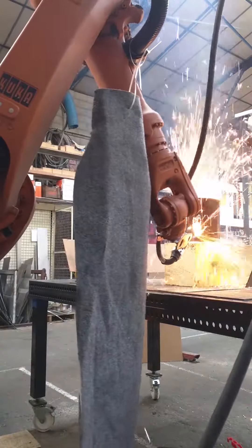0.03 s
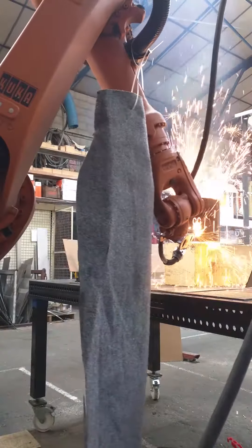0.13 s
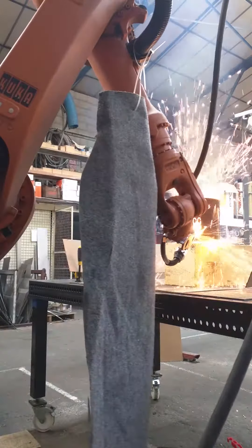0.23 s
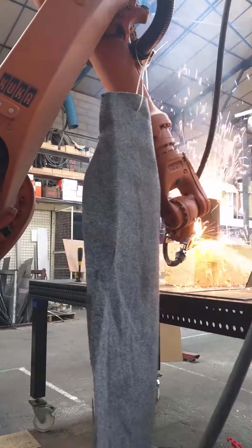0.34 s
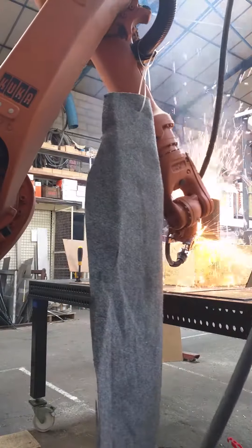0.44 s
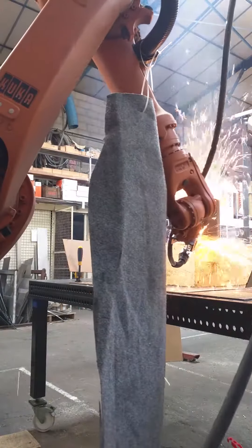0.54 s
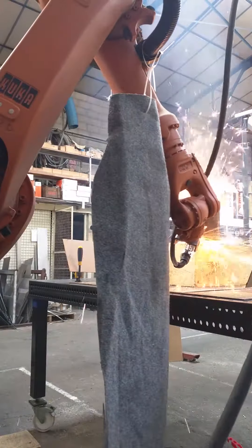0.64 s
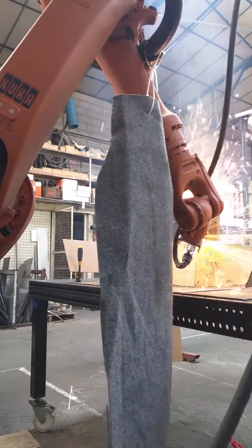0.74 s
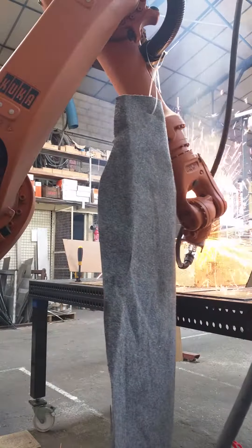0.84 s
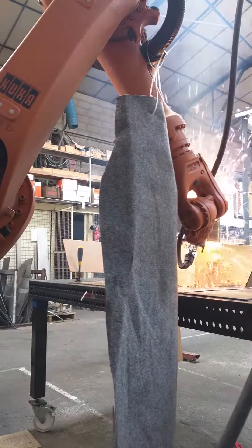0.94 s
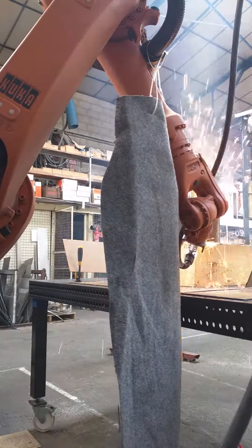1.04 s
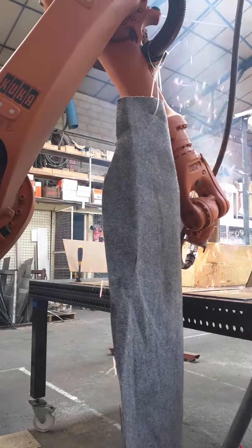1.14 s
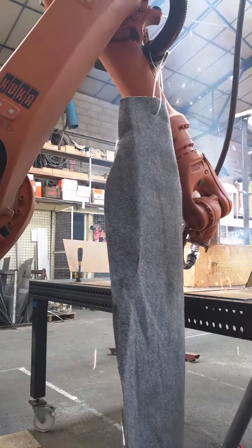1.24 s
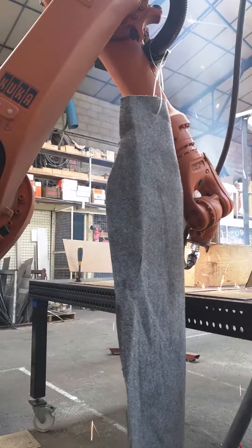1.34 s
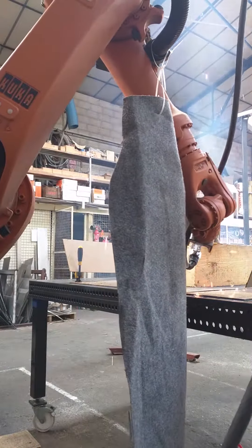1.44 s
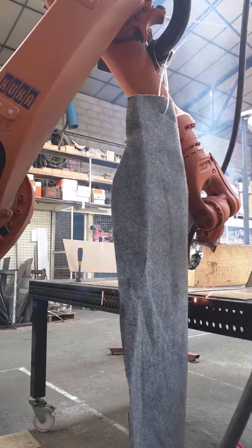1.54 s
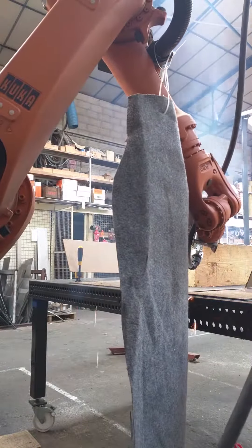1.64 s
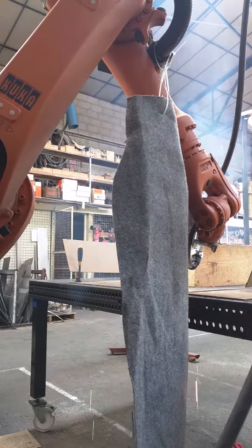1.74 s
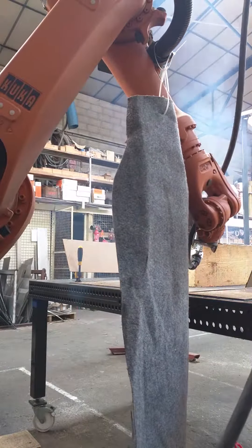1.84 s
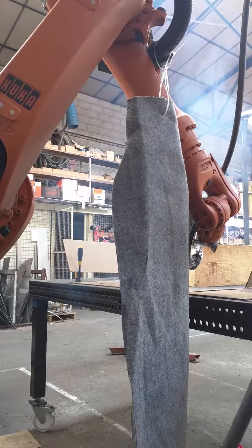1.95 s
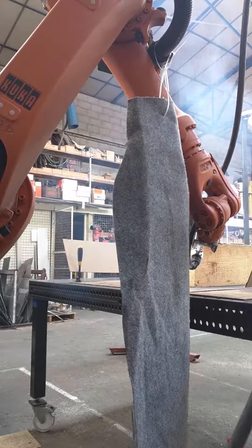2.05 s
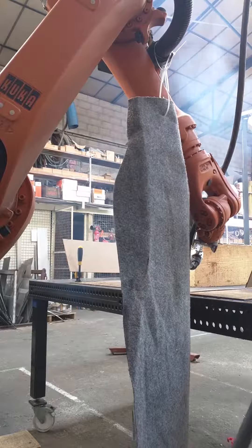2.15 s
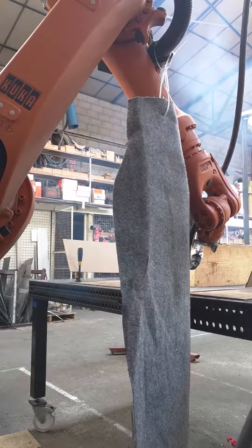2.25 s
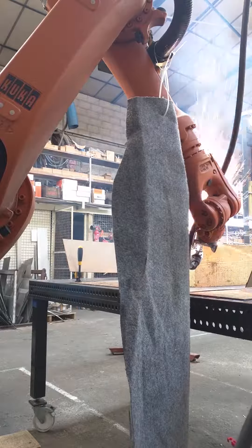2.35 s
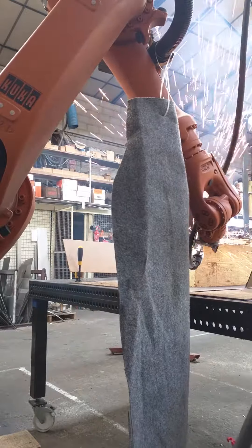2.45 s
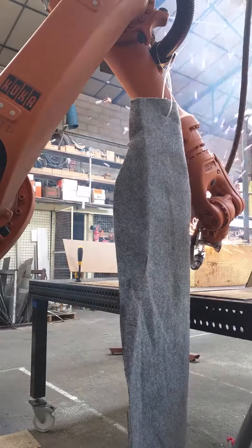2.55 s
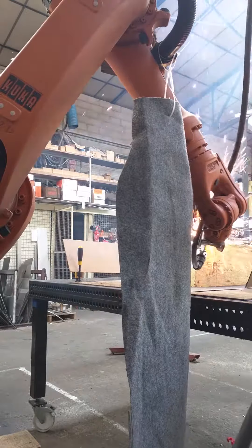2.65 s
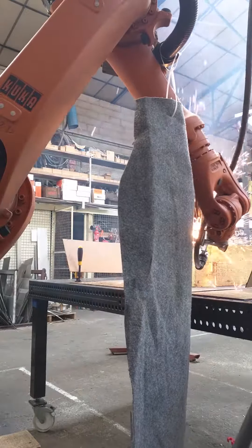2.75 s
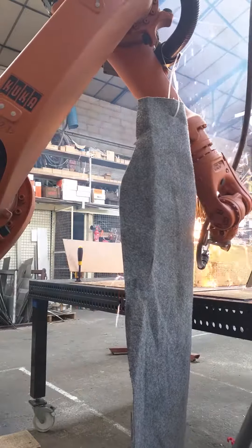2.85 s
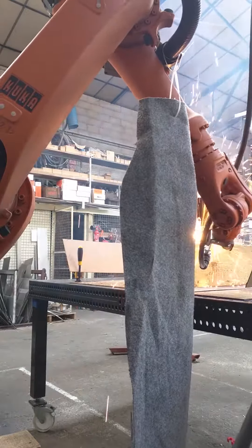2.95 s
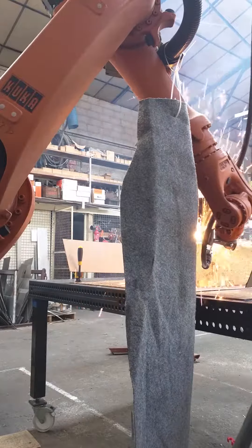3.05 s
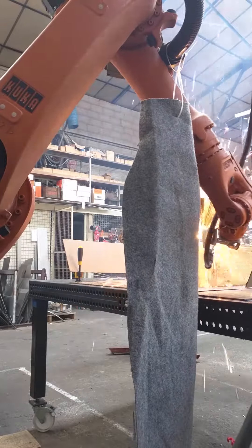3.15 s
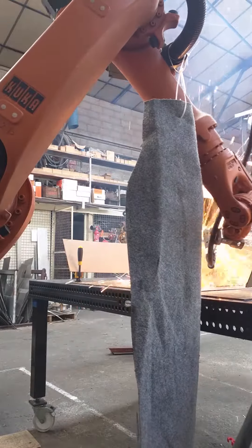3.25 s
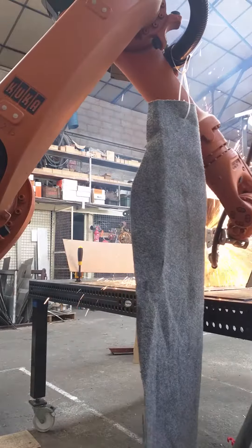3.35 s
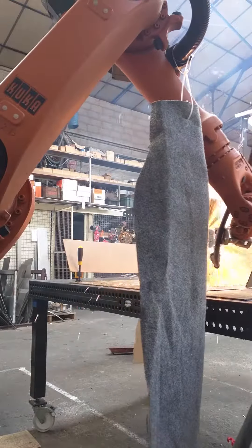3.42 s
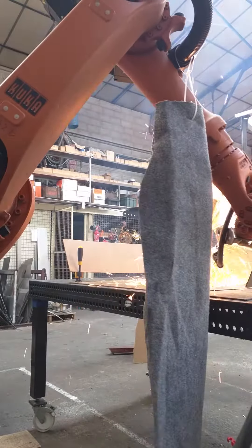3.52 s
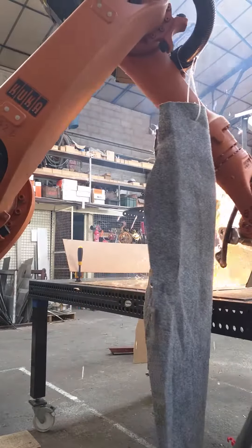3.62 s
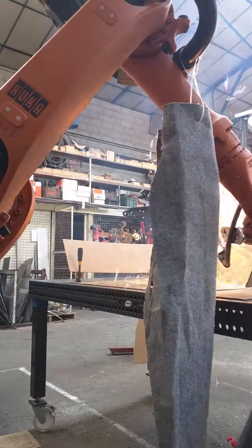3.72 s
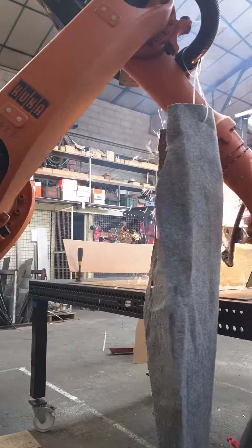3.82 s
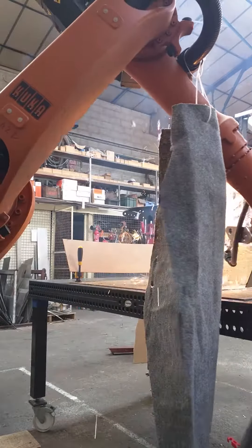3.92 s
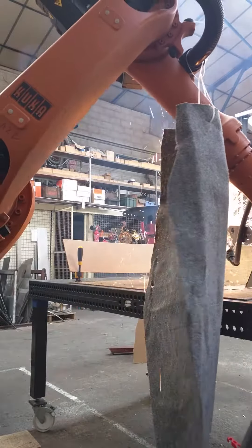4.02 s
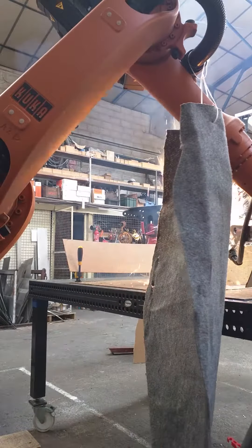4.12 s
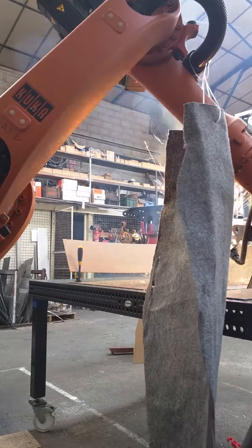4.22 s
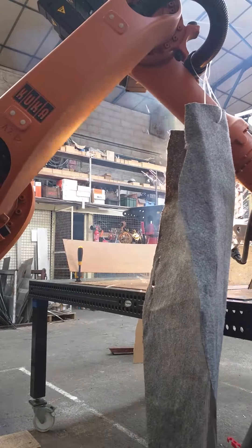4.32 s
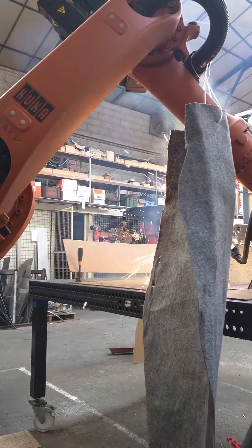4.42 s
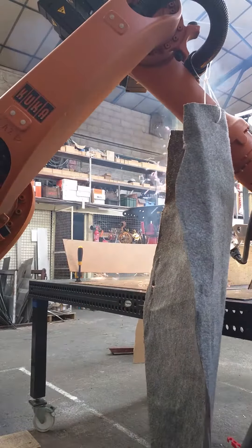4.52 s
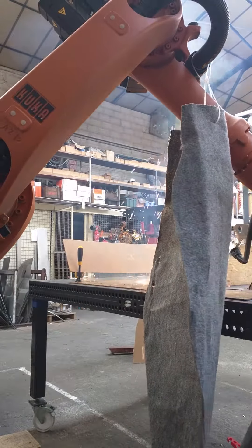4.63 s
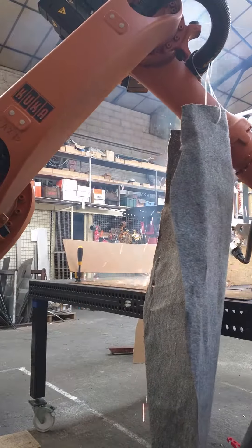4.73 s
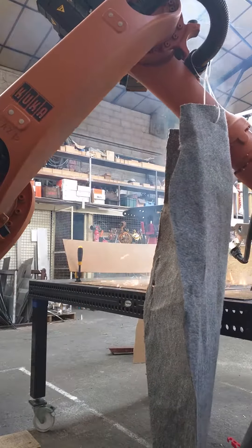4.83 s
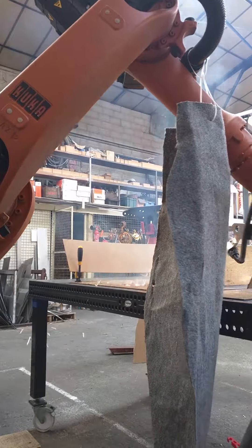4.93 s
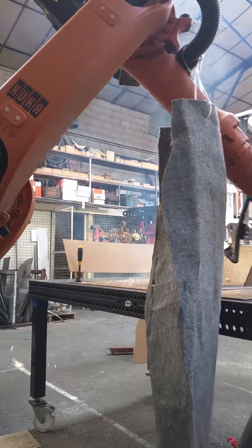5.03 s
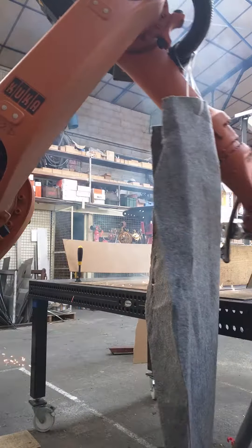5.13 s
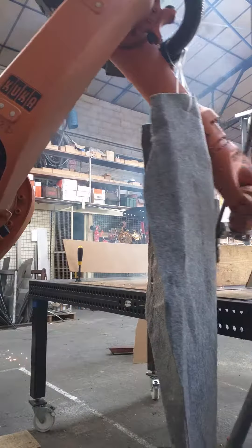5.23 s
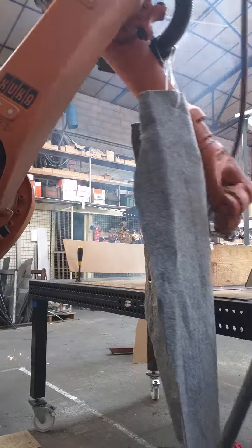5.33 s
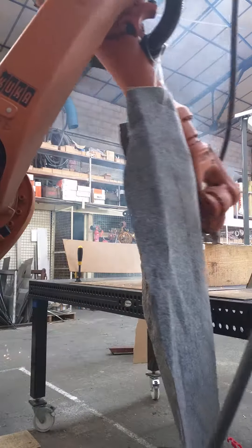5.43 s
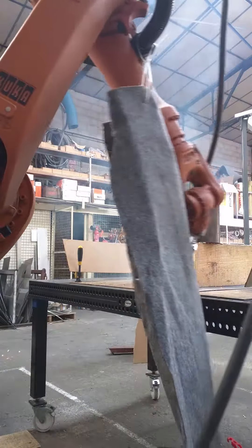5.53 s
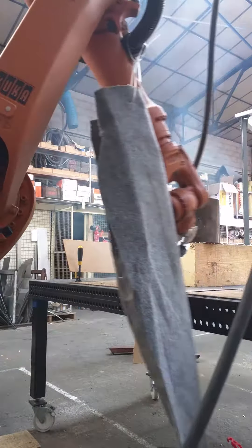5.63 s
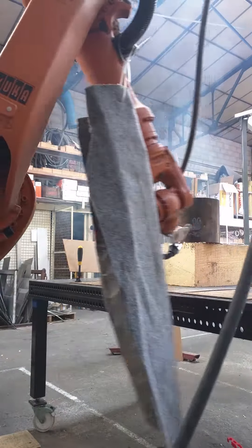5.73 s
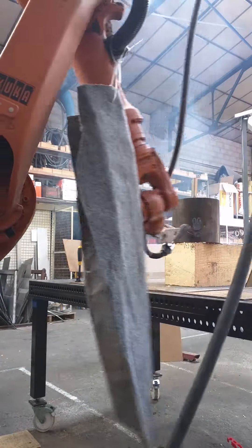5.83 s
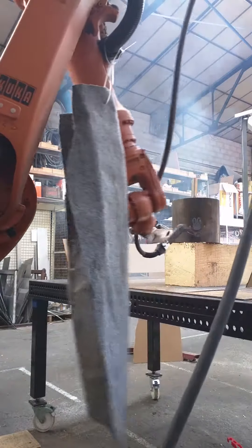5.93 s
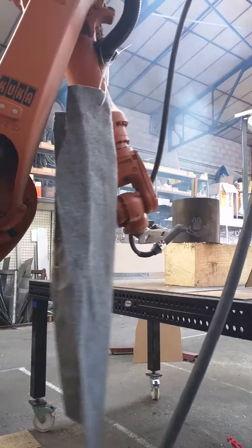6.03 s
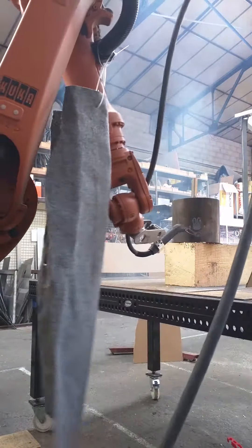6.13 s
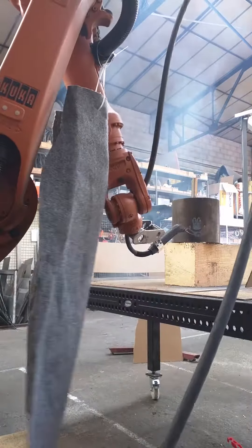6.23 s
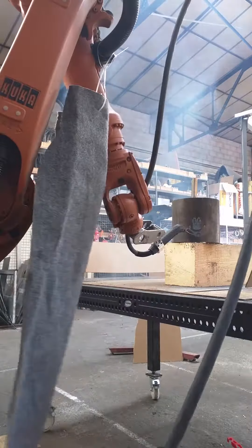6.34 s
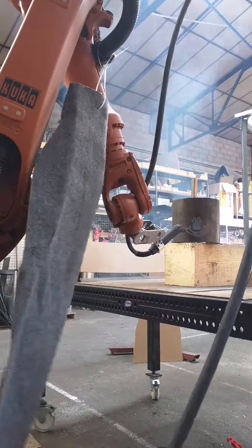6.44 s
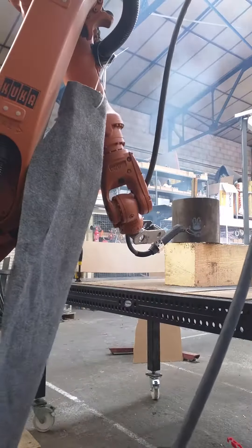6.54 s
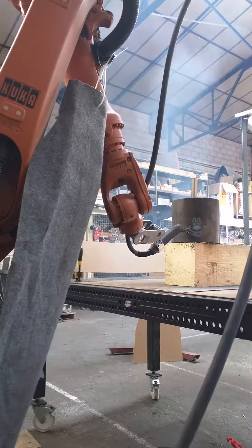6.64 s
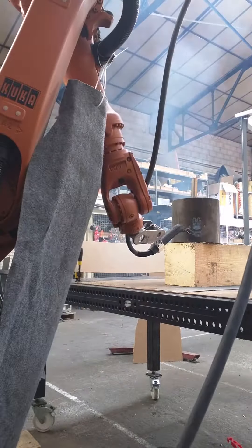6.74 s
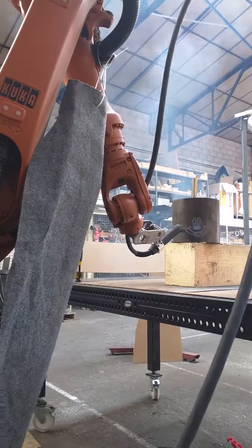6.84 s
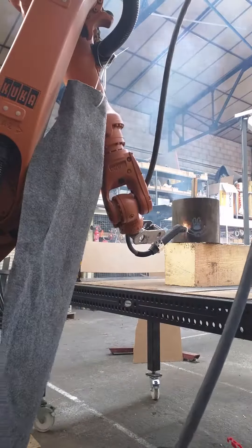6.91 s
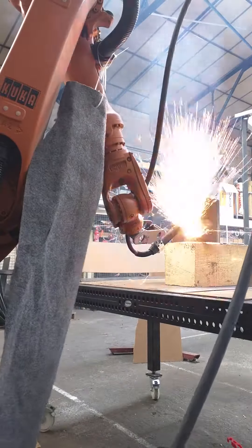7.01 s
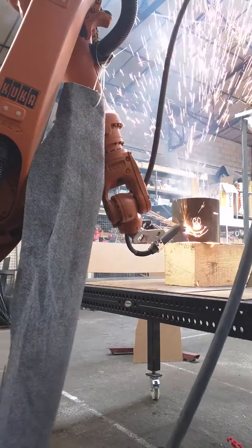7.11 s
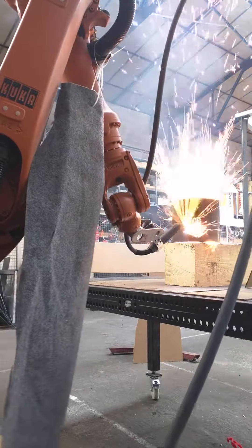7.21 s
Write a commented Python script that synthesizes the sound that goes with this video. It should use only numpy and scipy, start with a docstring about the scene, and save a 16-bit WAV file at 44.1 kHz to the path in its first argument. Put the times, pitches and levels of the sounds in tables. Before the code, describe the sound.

A plasma torch on a robot arm hisses and roars through steel pipe in a large workshop, popping out, draining, and striking again over machine hum.

```python
"""A robot-held plasma torch cuts a steel pipe in a large workshop over humming machines.
A cut is under way: arc roar in the pipe and nozzle hiss, both noise shaped by moving resonances.
The arc goes out with a pop, cooling air hisses on, then the valve shuts and the hiss drains away.
A second cycle bursts with cold air, strikes, roars, spits, pops, cools and drains; a third then starts.
Below lie sine hum and whine, a noise rumble, and a decaying noise tail for the hall."""
import sys
import numpy as np
from scipy import signal
from scipy.fft import rfft, irfft, next_fast_len
from scipy.io import wavfile
from scipy.ndimage import map_coordinates

SR = 44100
rng = np.random.default_rng(int(sys.argv[2]) if len(sys.argv) > 2 else 0)


def master_out(mix):
    """Clip the mix to full scale and print it as 16-bit PCM to the path in sys.argv[1]."""
    frames = np.transpose(np.atleast_2d(mix))
    ceiling = np.clip(frames, -1, 1)
    pcm = np.round(ceiling * 32767).astype(np.int16)
    wavfile.write(sys.argv[1], SR, pcm)


N = 320607

# raw noise spectra of the torch, before its resonances: (frequency [Hz], relative density [dB per Hz])
HISS_SPECTRUM = [(100, -35), (900, -22), (1500, -11), (2500, -4.8), (3400, -1), (5000, 0.7), (8000, -1.2),
                 (9500, 0.3), (12000, -18), (16000, -26)]
FIZZ_SPECTRUM = [(2000, -49), (6000, -14.5), (8000, -5), (9500, -3.4), (10800, 1), (12700, 1.5),
                 (13700, -2), (15800, -1.7)]
ROAR_SPECTRUM = [(25, -22), (70, -18), (115, -4), (180, -4.5), (300, -5), (450, -2.5), (820, 0), (1050, -8),
                 (1500, -7.5), (3000, -35)]
RASP_SPECTRUM = [(400, -36), (900, -6.5), (1150, -8.5), (1450, 1.5), (2200, 1.5), (2600, -3), (3500, -2.5),
                 (6000, -25.5)]


def torch(leak_reach=0.82):
    """One air supply feeds the hiss at the nozzle and the roar in the cut."""
    hiss, fizz, roar, rasp = turbulence([HISS_SPECTRUM, FIZZ_SPECTRUM, ROAR_SPECTRUM, RASP_SPECTRUM])
    supply = valve(clock())
    dull_supply = supply ** leak_reach  # the slow leak is duller than the full jet
    return jet(hiss * dull_supply, fizz * supply) + cut(roar, rasp) * dull_supply


def cut(roar, rasp, roar_db=-43.5, roar_arc_db=11.5, roar_drain=0.6,
        rasp_db=-37, rasp_arc_db=10.6, rasp_drain=0.42, roar_cold_db=-5, rasp_cold_db=1,
        flare_db=6, flare_lag_s=0.02, flare_s=0.05, sputter_db=1.9, surge_db=0.5):
    """The jet in the pipe: soft with air alone, flaring as the arc catches, then sputtering in molten steel."""
    t = clock()
    since_on, since_out, _, rasp_loss_db = cycle(t)
    progress = ramp(since_on, since_on - since_out)
    depth = cutting(t)
    sag_db = drained(t, delay=0)
    flare = flare_db * bell(since_on, IGNITE_S + flare_lag_s, flare_s)
    sputter = sputter_db * wobble(130)
    surge = surge_db * wobble(7)

    roar_level = roar_db + roar_arc_db * depth + roar_cold_db * cold(t) + flare - roar_drain * sag_db
    rasp_arc = (rasp_arc_db - rasp_loss_db * progress ** 2) * depth
    rasp_level = rasp_db + rasp_arc + rasp_cold_db * cold(t) - rasp_drain * sag_db
    sputtering_roar = unit(roar * amp(sputter)) * amp(roar_level)
    sputtering_rasp = unit(rasp * amp(sputter / 2)) * amp(rasp_level)
    return (sputtering_roar + sputtering_rasp) * amp(surge)


# jet level as the arm turns the torch, before trims and the valve's moves:
# (time [s], hiss level [dB], fizz level [dB]); the first pass is in two parts, cutting and cooling
JET_FIRST_PASS = [
    [(0.06, -23, -20), (0.254, -23, -19), (1.05, -23, -20), (1.19, -23, -18)],
    [(1.46, -24, -24), (1.718, -25, -21), (1.836, -26, -23), (2.05, -24, -18)],
]
JET_SECOND_PASS = [(2.64, -21, -18), (2.71, -24, -18), (3.01, -22, -19), (4.39, -26, -19), (4.65, -24, -17),
                   (4.7, -25, -23), (4.95, -19, -19), (4.96, -22, -19), (5.45, -24, -19), (5.75, -31, -26),
                   (5.84, -28, -20), (6.05, -23, -19), (6.7, -25, -19)]


def jet(hiss, fizz, hiss_db=1.0, steady_db=-31, fizz_db=2.1, burst_db=4.1, hiss_burst_db=0.5,
        choke_db=5.5, choke_s=0.036, choke_lag_s=0.012, hiss_choke=0.45, hiss_drain=0.55,
        flutter_db=0.53, waver_db=0.75):
    """Air at the nozzle: brightest while cold, choked briefly as the arc catches, dulling as the hose drains."""
    t = clock()
    hiss_level, fizz_level = curves(np.vstack([*JET_FIRST_PASS, JET_SECOND_PASS]))
    choke = choke_db * bell(cycle(t)[0], IGNITE_S + choke_lag_s, choke_s)
    flutter = flutter_db * wobble(45)
    # a steady hiss floor lies under the moving hiss level, so its dips stay shallow
    hiss = hiss * np.hypot(amp(hiss_level + hiss_db), amp(steady_db))
    hiss = hiss * amp(hiss_burst_db * cold(t) - hiss_choke * choke - hiss_drain * drained(t))
    fizz_motion = burst_db * cold(t) - choke - drained(t) + waver_db * wobble(14)
    fizz = fizz * amp(fizz_level + fizz_db + fizz_motion)
    return (hiss + fizz) * amp(flutter)


def turbulence(spectra, size=2048):
    """One noise of steady rms 1 for each spectrum, all with the torch's moving colour."""
    hz, s, z = signal.stft(rng.standard_normal((len(spectra), N)), SR, nperseg=size)
    colour = torch_colour(hz[:, None], s)
    gain = np.array([amp(along(spectrum, hz))[:, None] * colour for spectrum in spectra])
    # every time frame keeps the same total power
    gain = gain / np.linalg.norm(gain, axis=1, keepdims=True)
    sounds = signal.istft(z * gain, SR, nperseg=size)[1]
    return [unit(x[:N]) for x in sounds]


# air resonances of the pipe: (frequency [Hz], width [Hz], lift at full strength [dB])
PIPE_RESONANCES = [(394, 77, 8), (534, 34, 10), (593, 69, 12), (748, 112, 7), (1360, 73, -3.5),
                   (2158, 80, 4)]
# resonances of the nozzle and its gap to the steel, scaled by how freely it rings:
# (frequency [Hz], width [Hz], lift at ringing 1 [dB])
NOZZLE_RESONANCES = [(3865, 110, 8.5), (4560, 180, 6), (4850, 450, 5), (6000, 240, 5), (6490, 160, 7),
                     (7550, 200, 1.5), (10150, 300, 3.3), (11380, 100, 3), (12030, 260, 5.5),
                     (14600, 240, 4), (15020, 350, 7), (15620, 250, 4)]
# a resonance of the cut, mostly rising as the torch works round the pipe: (time [s], pitch [Hz])
KERF_PITCH = [(1.2, 1540), (2.9, 1470), (3.5, 1480), (3.9, 1680), (4.8, 1700), (5.3, 1820)]
# whistles of the jet on the edges of the steel: (start [s], length [s], pitch [Hz], width [Hz], lift [dB])
EDGE_WHISTLES = [(0, 1.2, 9950, 350, 3), (2.5, .14, 4600, 260, 3), (2.85, 1.7, 4900, 300, 3),
                 (3.6, 2.3, 10080, 320, 2), (4.1, .55, 12250, 700, 2.5), (4.8, .65, 6200, 800, 2.5),
                 (5.88, 1.4, 12580, 600, 4.8), (6.03, .65, 4600, 300, 2)]


def torch_colour(hz, s, fade=0.06, echo=0.1, drift=.0001, weak_db=5, dulling=0.12, count=12,
                 ring=0.7, ring_cold=0.5, ring_damped=0.3, ring_drain=0.3, kerf_width_hz=190, kerf_db=5,
                 sigh_hz=3100, sigh_width_hz=1100, sigh=0.22, echo_hz=1000):
    """Gain over frequency and time: pipe, cut and nozzle resonances, whistles and echoes from nearby steel."""
    # the nozzle rings most in the cold burst, less while the arc burns or the air dies
    ringing = ring + ring_cold * cold(s) - ring_damped * cutting(s)
    ringing = ringing * amp(-ring_drain * drained(s))
    lift_db = lifts(PIPE_RESONANCES, hz) + ringing * lifts(NOZZLE_RESONANCES, hz)
    kerf_hz = np.interp(s, *np.transpose(KERF_PITCH))
    lift_db = lift_db + kerf_db * bell(hz, kerf_hz, kerf_width_hz)
    for start, length, centre, width, db in EDGE_WHISTLES:
        held = ramp(np.minimum(s - start, start + length - s) + fade, fade)
        lift_db = lift_db + db * bell(hz, centre, width) * held
    # as the pressure drains, the slowing jet loses its highest frequencies first and sinks to a sigh
    khz_above = np.maximum(hz - 7500, 0) / 1000
    lift_db = lift_db - dulling * np.maximum(drained(s) - weak_db, 0) * khz_above
    lift_db = lift_db + sigh * drained(s) * bell(hz, sigh_hz, sigh_width_hz)
    # short echoes off small surfaces comb the treble; their delays [s] change slowly as the arm moves
    comb = 1
    for delay, speed in zip(rng.uniform(.003, .015, count), rng.standard_normal(count)):
        moving_delay = delay + drift * speed * s
        comb = comb + echo * ramp(hz, echo_hz) * np.cos(2 * np.pi * hz * moving_delay)
    return amp(lift_db) * comb


# cutting cycles; the first is already under way, the last runs on: (air on [s], arc out [s],
# valve shut [s], rasp lost by the end of the cut [dB], pop at arc out [dB])
CUT_CYCLES = [(-1.5, 1.199, 2.026, 0, -14), (2.453, 4.666, 6.671, 7, -16), (7.095, 9.3, 11.3, 0, -15)]
LEAK_S = 0.032  # faint leak before the valve snaps open


def cycle(t):
    """For the cycle running at t: seconds since air on, arc out and valve shut, and its loss of rasp."""
    rows = np.array(CUT_CYCLES)
    current = np.searchsorted(rows[1:, 0] - LEAK_S, t)
    on, out, shut, loss_db, _ = rows[current].T
    return t - on, t - out, t - shut, loss_db


LEAK_DB, OPEN_S = -21.5, 0.01  # leak gain, and time for the valve to open


def valve(t):
    """Gain of the air supply: a faint leak, then wide open."""
    return amp(LEAK_DB * (1 - ramp(cycle(t)[0], OPEN_S)))


# the hose drains once the valve shuts; each layer of sound takes its own share of this fall
DRAIN_DELAY_S, DRAIN_DB_PER_S = 0.05, 104


def drained(t, delay=DRAIN_DELAY_S):
    """The fall in the jet since the valve shut, in decibels."""
    return DRAIN_DB_PER_S * np.maximum(cycle(t)[2] - delay, 0)


# the arc catches after a burst of cold air, bites through the wall, and the cut cools once it is out
IGNITE_S, PIERCE_S, COOL_S = 0.108, 0.42, 0.3


def cold(t, fade=0.01):
    """1 during the burst of cold air, 0 once the arc has caught."""
    return ramp(IGNITE_S - cycle(t)[0], fade)


def cutting(t):
    """How deep the arc is in the steel, 0-1."""
    since_on, since_out, _, _ = cycle(t)
    return ramp(since_on - IGNITE_S, PIERCE_S) * (1 - ramp(since_out, COOL_S))


# hollow pop of the arc: (frequency [Hz], relative level [dB])
POP_SPECTRUM = [(30, -22), (90, -2), (200, -1.5), (600, -2), (1000, -8), (1550, -6), (2300, -5.5),
                (3200, -17), (6000, -35)]
# the arc spits in mid-cut: (time [s], level [dB])
ARC_SPITS = [(2.932, -22), (3.722, -26)]


def pops(flutter_db=-30):
    """The arc pops hollowly in the pipe as it spits or goes out; then air flutters as it refills the cut."""
    flutter = unit(noise(POP_SPECTRUM) * amp(1.2 * wobble(90)))
    hollow = lambda hz: along(POP_SPECTRUM, hz) + 0.7 * lifts(PIPE_RESONANCES, hz)
    arc_outs = [(out, db) for _, out, _, _, db in CUT_CYCLES]
    bangs = sum(amp(db) * knock(s, hollow, hold=0.0056, t60=0.026) for s, db in arc_outs + ARC_SPITS)
    refill = sum(burst(s + 0.019, rise=0.007, hold=0.115, t60=0.35) for s, _ in arc_outs)
    return bangs + amp(flutter_db) * flutter * refill


# brief rushes as the jet grazes an edge: (centre [s], length at half height [s], pitch [Hz],
# width [Hz], peak level [dB])
EDGE_GRAZES = [(1.41, .024, 4400, 1000, -19.5), (5.485, .07, 12000, 4000, -20),
               (5.87, .06, 12000, 4000, -23)]


def grazes():
    """The jet rushes briefly over an edge of the steel: resonant noise under a bell envelope."""
    total = 0
    for s, length, centre, width, db in EDGE_GRAZES:
        rush = resonant_noise(centre, width)
        total = total + amp(db) * bell(clock(), s, length) * rush
    return total


# the note that the jet blows on the pipe's mouth, one curve a pass, before trim: (time [s], level [dB])
MOUTH_NOTE_LEVEL = [
    [(0.03, -35), (0.13, -40), (0.32, -35), (1.76, -42), (2.0, -37), (2.06, -43)],
    [(2.64, -42), (3.42, -33), (3.62, -40), (5.07, -49), (6.54, -38), (6.68, -45)],
]


def flute(note_hz=1266, width_hz=68, note_db=0.7, note_drain=0.8, build_s=0.08, build_db=12):
    """A breathy note from air crossing the pipe's mouth; it builds with the air and dies with the pressure."""
    t = clock()
    note = resonant_noise(note_hz, width_hz)
    level = curves(np.vstack(MOUTH_NOTE_LEVEL))[0] + note_db - note_drain * drained(t)
    unbuilt = 1 - ramp(cycle(t)[0], build_s)
    return note * valve(t) * amp(level - build_db * unbuilt)


# low push of air: (frequency [Hz], relative level [dB])
THUD_SPECTRUM = [(30, -6), (100, -7), (300, -4.5), (480, -9), (1200, -20), (4000, -41)]


def thuds(catch_db=-37, shut_db=-30):
    """Short low pushes of air as the arc catches and as the valve shuts."""
    pushes = []
    for on, _, shut, _, _ in CUT_CYCLES:
        pushes += [(on + IGNITE_S, catch_db), (shut, shut_db)]
    colour = lambda hz: along(THUD_SPECTRUM, hz)
    return sum(amp(db) * knock(s, colour, hold=0.0068, t60=0.16) for s, db in pushes if s > 0)


# decay of the hall: (frequency [Hz], time to fall 60 dB [s])
HALL_DECAY = [(100, 2.4), (1000, 0.45), (4000, 1.08), (8000, 0.96), (15000, .45)]


def hall(x, size=256):
    """The hall's tail: noise that dies away at its own rate in each band, convolved with the sound."""
    hz, t, z = signal.stft(rng.standard_normal(SR), SR, nperseg=size)
    decay = amp(-60 * t / along(HALL_DECAY, hz)[:, None])
    tail = signal.istft(z * decay, SR, nperseg=size)[1]
    return signal.fftconvolve(x, tail / np.linalg.norm(tail))[:N]


# the robot's low rumble, strongest as the arm swings back, before trim and swell: (time [s], level [dB])
RUMBLE_LEVEL = [(0.0, -53), (2.0, -49), (3.08, -59), (3.75, -49), (5.26, -52), (5.41, -44), (6.64, -48),
                (7.27, -57)]
# colour of the rumble: (frequency [Hz], relative density [dB per Hz])
RUMBLE_SPECTRUM = [(15, -13), (30, 2), (55, 10.5), (85, -5), (130, -7), (300, -16), (700, -24), (2000, -36),
                   (8000, -48)]
# mains hum and a machine whine, before waver: (frequency [Hz], rms level [dB])
HUM_TONES = [(50, -58), (100, -60.5), (506, -58.5)]


def machines(rumble_db=-0.9, waver_db=2.0, swell_db=1.5):
    """The robot rumbles as low noise; the power supply hums and whines as wavering sines."""
    hum = 0
    for hz, db in HUM_TONES:
        level = amp(db + waver_db * wobble(6)) * np.sqrt(2)  # rms to peak
        hum = hum + level * np.sin(2 * np.pi * hz * clock() + 0.43 * wobble(5))
    rumble_level = curves(RUMBLE_LEVEL)[0] + rumble_db + swell_db * wobble(5)
    return hum + noise(RUMBLE_SPECTRUM) * amp(rumble_level)


def knock(s, colour_db, hold, t60, size=4096):
    """A brief puff of pressure at s, rung causally through a colour; its energy is that of rms 1 over hold."""
    hz, t = np.fft.rfftfreq(size, 1 / SR), np.arange(size) / SR
    # folding the cepstrum gives minimum phase, so nothing rings ahead of the puff
    cepstrum = irfft(np.log(amp(colour_db(hz))))
    body = np.exp(rfft(2 * cepstrum[:size // 2], size))
    puff = rfft(rng.standard_normal(size) * amp(-60 * np.maximum(t - hold, 0) / t60))
    pulse = irfft(body * puff)
    pulse = pulse * np.sqrt(hold * SR) / np.linalg.norm(pulse)
    return np.pad(pulse, (round(s * SR), N))[:N]


def burst(s, rise, hold, t60):
    """An envelope that rises at s, holds, then dies away."""
    age = np.maximum(clock() - s, 0)
    return (1 - np.exp(-age / rise)) * amp(-60 * np.maximum(age - hold, 0) / t60)


def noise(spectrum):
    """Steady noise of rms 1."""
    return unit(filtered(rng.standard_normal(N), lambda hz: amp(along(spectrum, hz))))


def resonant_noise(centre, width):
    """Noise of rms 1 through one resonance."""
    return unit(filtered(rng.standard_normal(N), lambda hz: resonance(hz, centre, width)))


def resonance(hz, centre, width):
    """A peak of height 1 with wide skirts."""
    return 1 / (1 + (2 * (hz - centre) / width) ** 2)


def lifts(resonances, hz):
    """The lift in dB that a set of resonances gives each frequency."""
    return sum(db * bell(hz, centre, width) for centre, width, db in resonances)


def bell(x, centre, width):
    """A bump of height 1 and the given width at half height."""
    return .5 ** ((2 * (x - centre) / width) ** 2)


def ramp(age, length):
    """0 before age zero, rising to 1 over length."""
    return np.clip(age / length, 0, 1)


def wobble(rate):
    """A smooth random curve, rate knots a second."""
    knots = rng.standard_normal(int(N * rate / SR) + 4)
    return map_coordinates(knots, [np.arange(N) * rate / SR])


def filtered(x, response):
    """x times a response of frequency."""
    m = next_fast_len(N + SR // 2)
    return irfft(rfft(x, m) * response(np.fft.rfftfreq(m, 1 / SR)), m)[..., :N]


def along(points, hz):
    """(frequency, value) points read on a log frequency axis."""
    f, v = np.transpose(points)
    return np.interp(np.log(hz + 1), np.log(f + 1), v)


def curves(rows):
    """One value per sample for each column after the time."""
    s, *cols = np.transpose(rows)
    return [np.interp(clock(), s, c) for c in cols]


def clock():
    """The time of every sample in seconds."""
    return np.arange(N) / SR


def amp(db):
    """Decibels to gain."""
    return 10 ** (np.asarray(db) / 20)


def unit(x):
    """x at rms 1."""
    return x / np.sqrt(np.mean(x ** 2) + 1e-20)


def scene(hall_db=-13):
    """Torch, hall and machines, alike in both channels."""
    work = torch() + grazes() + flute() + pops() + thuds()
    mono = work + amp(hall_db) * hall(work) + machines()
    return np.array([mono, mono])


TOP_HZ = 15800  # middle of the treble cutoff


def record(dry):
    """A steep treble cutoff, 200 Hz wide, with silence above it."""
    return filtered(dry, lambda hz: np.clip((TOP_HZ - hz) / 200 + .5, 0, 1) ** 2)


dry = scene()
out = record(dry)
master_out(out)
```